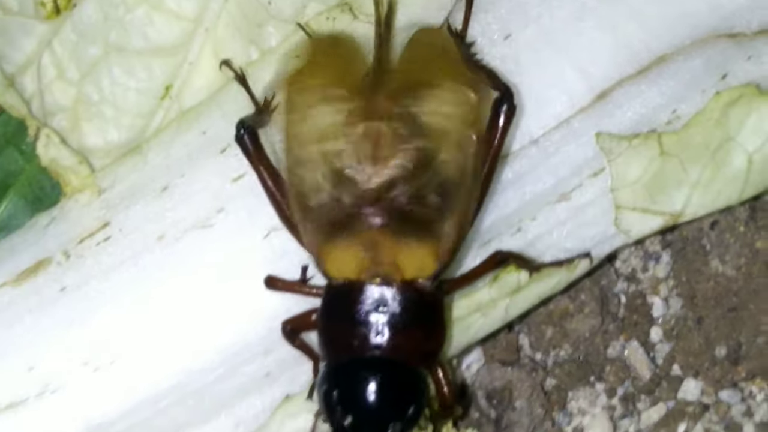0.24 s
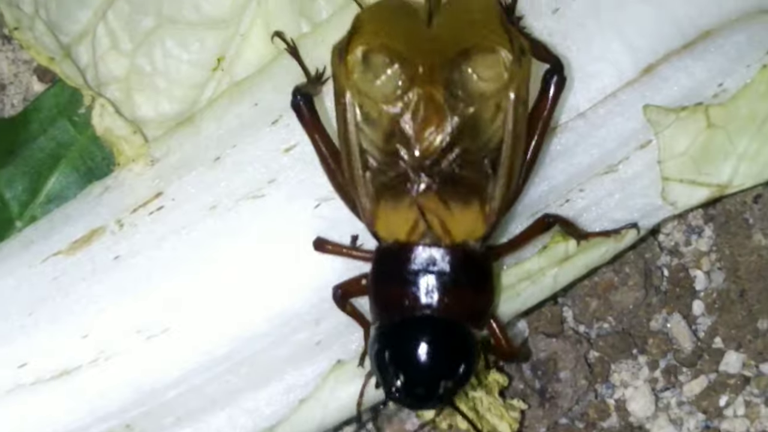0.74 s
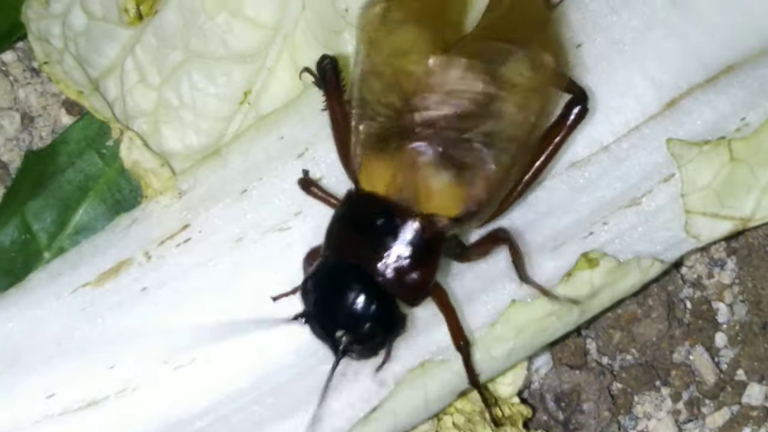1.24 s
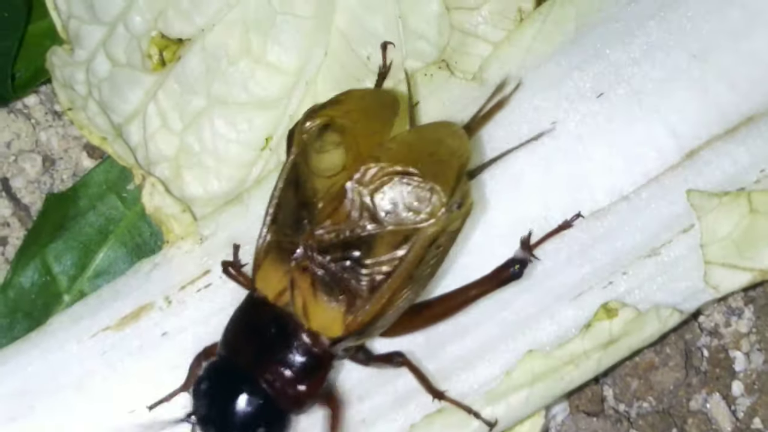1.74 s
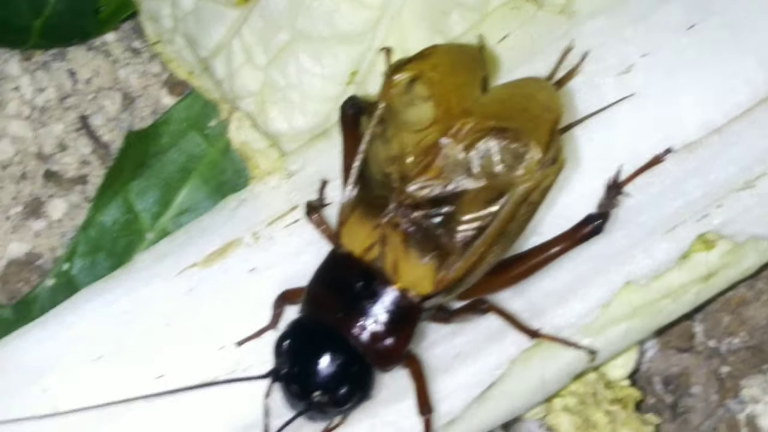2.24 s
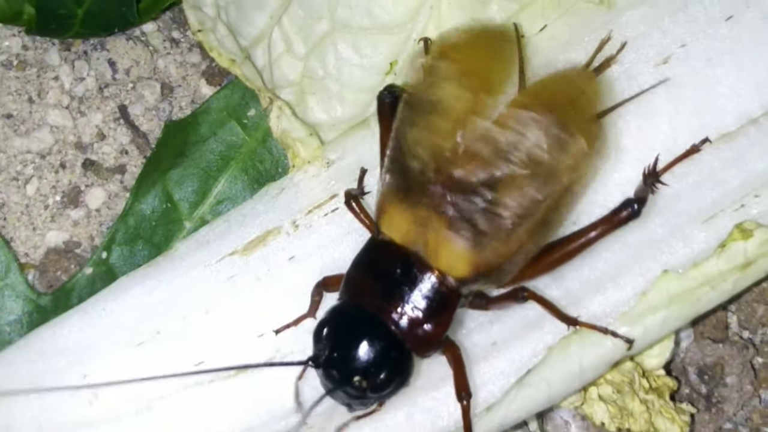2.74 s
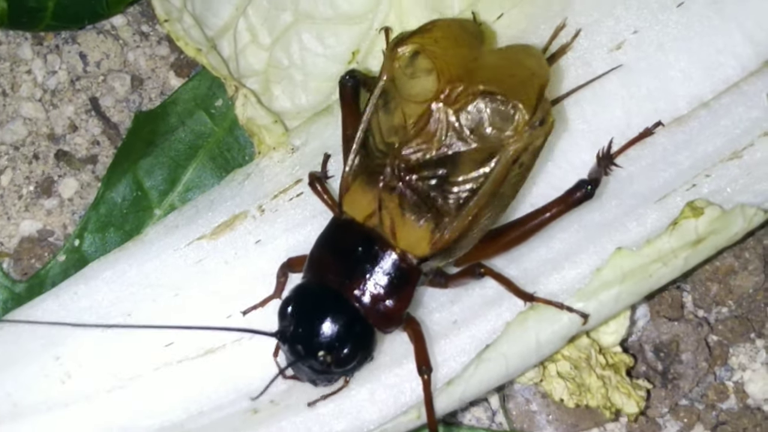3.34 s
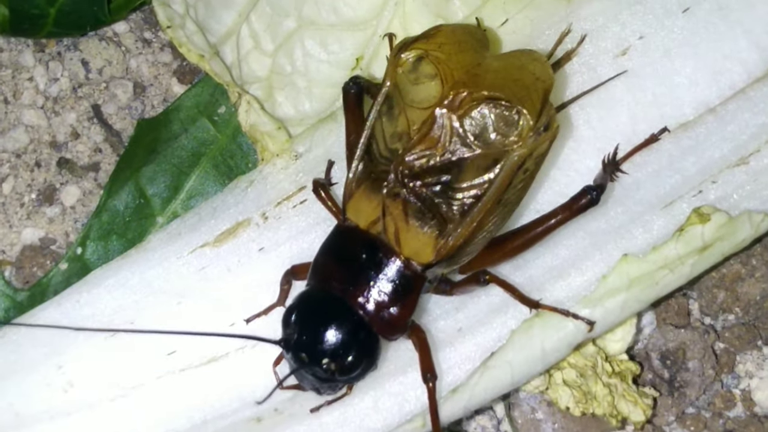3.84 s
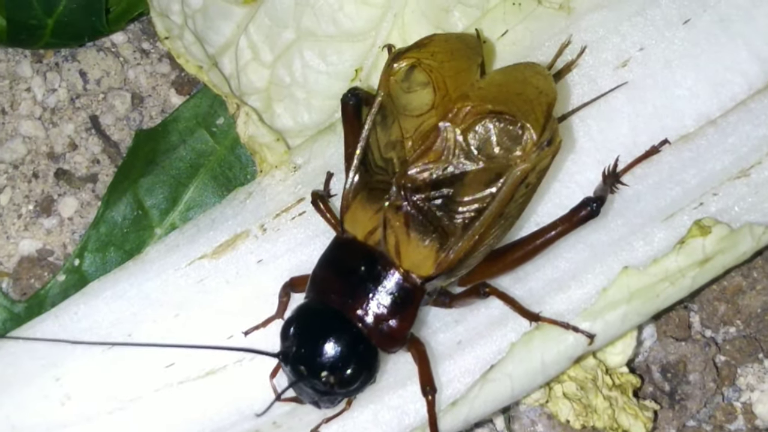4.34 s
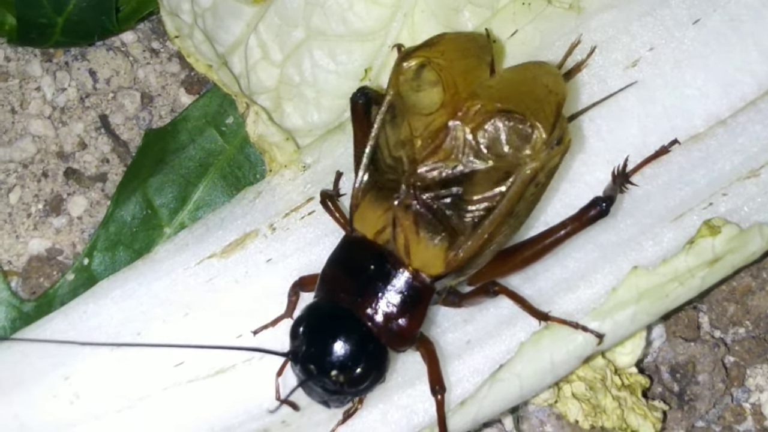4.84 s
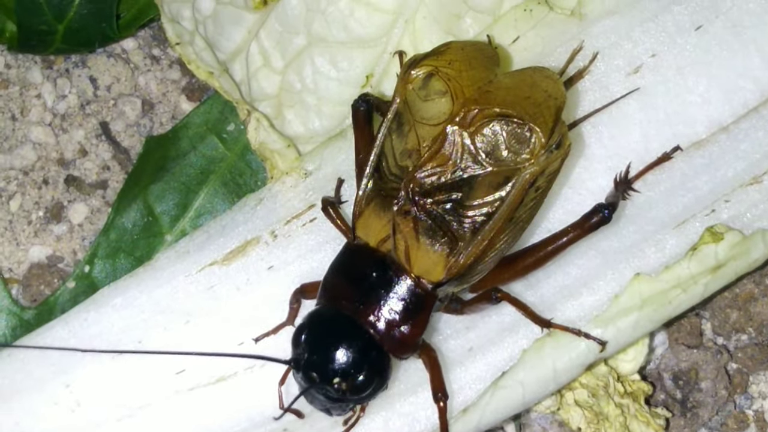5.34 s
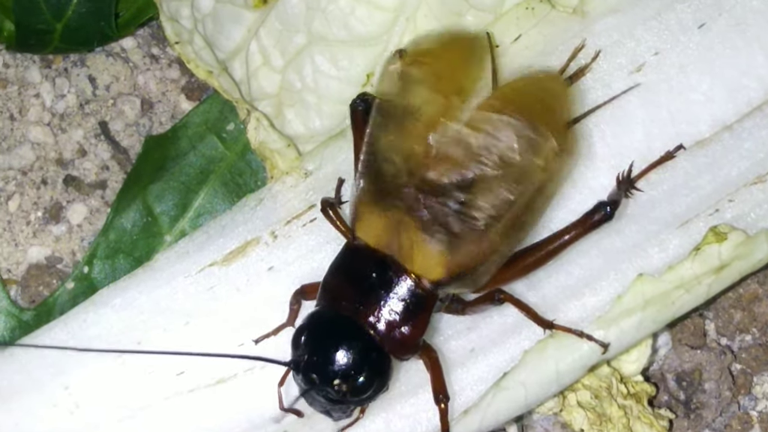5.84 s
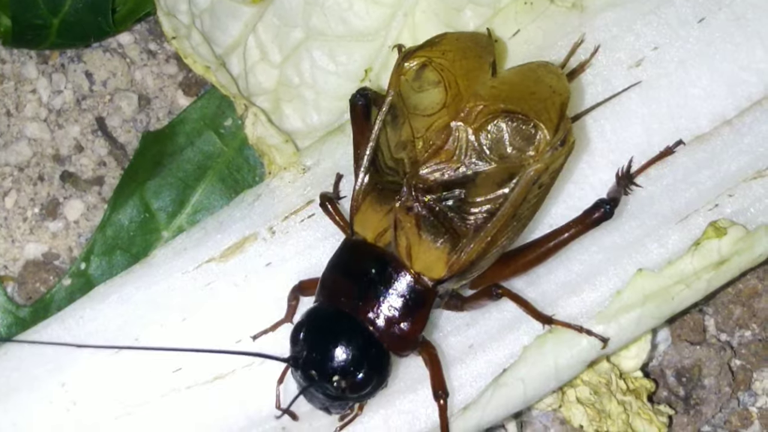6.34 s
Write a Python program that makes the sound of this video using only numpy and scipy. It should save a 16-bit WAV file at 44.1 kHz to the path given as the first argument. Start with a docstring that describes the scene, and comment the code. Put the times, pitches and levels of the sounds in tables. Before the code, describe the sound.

A single cricket chirps loudly, close to the microphone outdoors, for about six and a half seconds. Each chirp is a shrill, high whistle of three very fast pulses, with a raspy edge and a slight echo, and all are about equally loud. For the first two seconds they come four or five times a second, then ease to three or four, with a short pause just before 5.5 seconds. A faint low rumble, hum and thin hiss continue underneath. Soft rustles come at the start and near 1.7 seconds. A very faint, thin, distant squeal glides slowly upward from 0.5 to 1.7 seconds, and barely audible far calls appear between 2 and 5.5 seconds. Quiet dull bumps are scattered throughout, clustering from 3 to 4.3 seconds, with the clearest near 5.1. Three tiny dry ticks fall around 6 to 6.5 seconds as the chirping continues.

```python
"""A field cricket on a leaf

A cricket sings close by and turns once. It stridulates: in each of a chirp's three wing strokes a
scraper runs over a toothed file, giving a falling whistle with a rasping octave that the yard reflects.
Behind it are a low rumble and hum, dull bumps, rustles, one thin far squeal and some faint far calls.
A limiter holds every chirp to the same peak, so the background ducks under each one."""
import sys
import numpy as np
from scipy import signal
from scipy.fft import rfft, irfft
from scipy.io import wavfile
from scipy.ndimage import uniform_filter1d, minimum_filter1d

SR = 44100
rng = np.random.default_rng(int(sys.argv[2]) if len(sys.argv) > 2 else 0)


def bounce(signal):
    """Save signal as a 16-bit WAV file at the path given by the first command-line argument."""
    frames = np.transpose(np.atleast_2d(signal))
    limited = np.clip(frames, -1, 1)
    pcm = np.round(limited * 32767).astype(np.int16)
    wavfile.write(sys.argv[1], SR, pcm)


N = 291060
TIME = np.arange(N) / SR


def gain_of(db):
    """Amplitude ratio: a factor of ten for every 20 dB."""
    return 10 ** (np.asarray(db) / 20)


def unit_rms(x):
    """Normalisation of each channel to unit power."""
    return x / np.sqrt(np.mean(x ** 2, axis=-1, keepdims=True) + 1e-20)


def curve_at(points, hz):
    """Interpolation of a spectrum on a logarithmic frequency axis."""
    f, value = np.transpose(points)
    return np.interp(np.log(hz + 1), np.log(f + 1), value)


def add(mix, s, sound):
    """Superposition of a sound on a two-channel mix at time s."""
    part = mix[:, max(round(s * SR), 0):][:, :sound.shape[-1]]
    part += sound[..., :part.shape[1]]


def wander(rate_hz, size):
    """Random modulation: low-passed Gaussian noise of rms 1."""
    hz = np.fft.rfftfreq(size, 1 / SR)
    return unit_rms(irfft(rfft(rng.standard_normal(size)) * np.exp(-(hz / rate_hz) ** 2), size))


# Coherence between left and right: f/Hz, coherence
COHERENCE = [(30, 0.96), (250, 0.86), (600, 0.19), (2000, 0.063), (8000, 0.2)]

def noise(spectrum, size):
    """Partially coherent stereo noise of rms 1: the two sides are most alike at long wavelengths."""
    hz = np.fft.rfftfreq(size, 1 / SR)
    left, independent = rfft(rng.standard_normal((2, size)))
    coherence = curve_at(COHERENCE, hz)
    right = coherence * left + np.sqrt(1 - coherence ** 2) * independent
    return unit_rms(irfft(np.array([left, right]) * gain_of(curve_at(spectrum, hz)), size))


def yard(x, t60, gap_s, echoes_per_s=3000):
    """Diffuse reverberation: reflections of random sign decay exponentially, differently on each side."""
    t = TIME[:SR // 2]
    taps = rng.choice([-1., 1.], (2, len(t))) * (rng.random((2, len(t))) < echoes_per_s / SR)
    tail = taps * gain_of(-60 * t / t60) * (t > gap_s)
    tail /= np.linalg.norm(tail, axis=1, keepdims=True)
    return signal.oaconvolve(x[None], tail, axes=1)[:, :N]


# Spectra of the rumble and the distant air: f/Hz, relative level/dB
RUMBLE_SPECTRUM = [(15, -65.5), (28, -31), (40, -10), (50, -0.5), (72, 4.5), (100, -1.5), (135, -1.5),
                   (190, -13.5), (300, -49.5), (1000, -91)]
AIR_SPECTRUM = [(40, -26.5), (110, -5.5), (160, 5), (205, -8), (270, -6), (340, -16), (500, -19),
                (900, -19), (1500, -23), (2300, -18), (3300, -24.5), (4500, -25), (7000, -65)]
# Swells of the rumble: centre t/s, duration/s, gain/dB
RUMBLE_SWELLS = [(2.323, 0.25, 6), (3.472, 0.11, 7.5), (4.342, 0.24, 5)]
# Slow rise and fall of the air: t/s, gain/dB
AIR_DRIFT = [(0, 0), (1.5, 1.5), (2.5, 1), (5.2, 0), (5.8, 0.5), (6.6, 0.5)]

def outdoor_air(rumble_db=-48, air_db=-56):
    """Ambient noise: a low rumble and a broader rush under slow amplitude modulation."""
    swells_db = sum(db * np.maximum(1 - 2 * abs(TIME - s) / length_s, 0)
                    for s, length_s, db in RUMBLE_SWELLS)
    rumble = gain_of(rumble_db + swells_db + wander(8.6, N)) * noise(RUMBLE_SPECTRUM, N)
    drift_db = np.interp(TIME, *np.transpose(AIR_DRIFT))
    air = gain_of(air_db + drift_db + 3 * wander(7.7, N)) * noise(AIR_SPECTRUM, N)
    return (rumble + air) * gain_of([[-.7], [.7]])


# Partials of the hum: f/Hz, rms level/dB
HUM_PARTIALS = [(73, -63.5), (163, -68), (267, -73), (816, -88)]

def hum(waver_rad=1.3):
    """Random phase modulation makes each low partial waver."""
    return sum(gain_of(db) * np.sqrt(2) * np.sin(2 * np.pi * hz * TIME + waver_rad * wander(13, N))
               for hz, db in HUM_PARTIALS)


# Soft rustles: t/s, duration/s, level/dB
RUSTLES = [(-.05, 0.63, -45.5), (1.675, 0.18, -48), (3.49, 0.94, -61), (5.2, 0.5, -67)]
# Their spectrum: f/Hz, relative level/dB
RUSTLE_SPECTRUM = [(100, 9.5), (300, 9.5), (700, 0), (1500, -2), (3000, -6), (4500, -15.5), (8500, -30),
                   (11500, -3), (15000, -26.5)]

def rustles(fade_s=0.19, floor_db=-72.5, flicker_db=2):
    """Amplitude-modulated noise: flickering patches rise out of a faint floor."""
    patches = sum(gain_of(db) * np.clip(np.minimum(TIME - s, s + length_s - TIME) / fade_s, 0, 1)
                  for s, length_s, db in RUSTLES)
    envelope = (gain_of(floor_db) + patches) * gain_of(flicker_db * wander(54, N))
    return envelope * noise(RUSTLE_SPECTRUM, N)


# Spectrum of the hiss: f/Hz, relative level/dB
HISS_SPECTRUM = [(20, -78), (2500, -30.5), (4200, 14), (5600, 29), (8000, 1.5), (11500, 26), (16000, -7)]

def hiss(level_db=-70):
    """Stationary noise, faint and high."""
    return gain_of(level_db) * noise(HISS_SPECTRUM, N)


# Spectrum of the sizzle: f/Hz, relative level/dB
SIZZLE_SPECTRUM = [(3000, -11), (6000, -8), (8000, -23), (10000, -2), (12500, -0.5), (15000, -4),
                   (16500, -22)]

def high_sizzle(level_db=-65, patchy_db=2, end_s=2.3, fade_s=.3):
    """Amplitude-modulated noise: a faint, patchy, high sizzle that fades out by 2.3 s."""
    fade = np.clip((end_s - TIME) / fade_s, 0, 1)
    return fade * gain_of(level_db + patchy_db * wander(20, N)) * noise(SIZZLE_SPECTRUM, N)


# Faint far calls: t/s, duration/s, centre f/Hz, bandwidth/Hz, level/dB
FAR_CALLS = [(2.168, 0.16, 1192, 403, -64.5), (2.242, 0.64, 2460, 900, -59.5),
             (2.502, 0.3, 2444, 1120, -71), (3.223, 0.13, 1270, 340, -62.5),
             (4.293, 0.14, 1240, 338, -59.5), (5.365, 0.15, 1263, 316, -58.5)]

def far_calls():
    """Narrow-band noise: a random complex envelope on a carrier gives calls blurred by distance."""
    out = np.zeros((2, N))
    for s, length_s, hz, width_hz, db in FAR_CALLS:
        size = int(length_s * SR)
        blur = np.array([wander(width_hz / 2, size) + 1j * wander(width_hz / 2, size) for _ in range(2)])
        call = (blur * np.exp(2j * np.pi * hz * TIME[:size])).real
        add(out, s, gain_of(db) * call * signal.windows.tukey(size, .6))
    return out


# Course of the squeal: t/s, second harmonic f/Hz, relative level/dB
SQUEAL_GLIDE = [(0.521, 2655, -53.5), (0.564, 2476, -49.5), (0.659, 2430, -53), (0.769, 2580, -45.5),
                (0.861, 2720, -58), (1.04, 2760, -53), (1.3, 2860, -55), (1.452, 2898, -47.5),
                (1.55, 2930, -60), (1.62, 2973, -47), (1.73, 3140, -62.5)]
# Spectral envelope that its harmonics rise through: f/Hz, gain/dB
SQUEAL_SPECTRUM = [(1250, -7), (1500, -10), (2400, 2), (3100, 0), (3800, -20), (4150, -4.5), (4350, -9.5),
                   (4600, -33)]

def far_squeal(waver=0.0028, flicker_db=4.5, trim_db=-9):
    """A harmonic series glides slowly upward, its reverberation as strong as its direct sound."""
    s, hz, db = np.transpose(SQUEAL_GLIDE)
    t = np.arange(s[0], s[-1], 1 / SR)
    pitch = np.interp(t, s, hz) / 2 * (1 + waver * wander(120, len(t)))
    phase = 2 * np.pi * np.cumsum(pitch) / SR
    sound = np.zeros(len(t))
    for k in (1, 2, 3):
        harmonic_db = curve_at(SQUEAL_SPECTRUM, k * pitch) + flicker_db * wander(21, len(t))
        sound += gain_of(harmonic_db) * np.sin(k * phase)
    direct = np.zeros((2, N))
    add(direct, s[0], sound * gain_of(np.interp(t, s, db)) * signal.windows.tukey(len(t), .04))
    return gain_of(trim_db) * (direct + yard(direct[0], t60=0.49, gap_s=0.0042))


# Dull bumps: t/s, relative level/dB, middle/dB re thud, rasp/dB re thud, contact time/s
BUMPS = [(0.128, -35, -21, -28, 0.0057), (0.567, -41, -20, -21, 0.0065), (0.744, -31.5, -26.5, -27, 0.0054),
         (1.622, -42.5, -33, -27, 0.016), (2.197, -43.5, -10, -15, 0.037),
         (3.05, -30.5, -29.5, -41, 0.0064), (3.445, -38.5, -9.5, -8.5, 0.058), (3.6, -42.5, -7, -29, 0.029),
         (3.698, -44, -19, -24.5, 0.051), (3.886, -32, -15, -16.5, 0.017),
         (4.168, -39.5, -40.5, -44, 0.016), (4.224, -42.5, -10.5, -18, 0.067),
         (5.131, -26, -18.5, -28.5, 0.0078)]
# Spectra of a bump's three parts: f/Hz, relative level/dB
THUD_SPECTRUM = [(20, -42), (45, -2.5), (90, -6), (160, 6.5), (215, -2.5), (290, 4.5), (350, -6.5),
                 (450, -14), (800, -33.5), (2000, -57.5)]
MIDDLE_SPECTRUM = [(200, -44), (500, -5.5), (950, -5.5), (1500, -19), (2500, -23.5), (6000, -60.5)]
RASP_SPECTRUM = [(900, -27), (1800, 0.5), (2400, 10), (3000, -12.5), (4500, -14), (9000, -61.5)]

def bumps(size=16384, rise_s=0.0027, fall_s=0.037, thud_t60=0.73, scuff_t60=0.77, trim_db=-3):
    """Damped impacts with a two-stage decay: thud and scuff fall fast after contact, then linger."""
    out, t = np.zeros((2, N)), TIME[:size]
    attack = np.minimum(t / rise_s, 1)
    for s, db, middle_db, rasp_db, contact_s in BUMPS:
        push = np.exp(-np.maximum(t - contact_s, 0) / fall_s)
        thud = noise(THUD_SPECTRUM, size) * (push + gain_of(-16 - 60 * t / thud_t60))
        scuff = gain_of(middle_db) * noise(MIDDLE_SPECTRUM, size)
        scuff += gain_of(rasp_db) * noise(RASP_SPECTRUM, size)
        scuff *= (push + gain_of(-9 - 60 * t / scuff_t60)) * gain_of(3.3 * wander(150, size))
        add(out, s - rise_s, gain_of(db + trim_db) * (thud + scuff) * attack)
    return out * gain_of([[-1], [.7]])


# Dry ticks: t/s, level/dB
TICKS = [(5.901, -48.5), (6.207, -39), (6.476, -44)]
# Their spectrum: f/Hz, relative level/dB
TICK_SPECTRUM = [(150, -17), (500, 0), (900, -13.5), (2500, -20), (5000, -26), (10000, -53)]

def ticks(size=2048, fall_s=0.0034):
    """Heavy damping: tiny contacts die away within milliseconds."""
    out = np.zeros((2, N))
    for s, db in TICKS:
        add(out, s, gain_of(db) * noise(TICK_SPECTRUM, size) * np.exp(-TIME[:size] / fall_s))
    return out


def wing_resonance(x, band_hz=(4693, 5815)):
    """The wing membrane radiates the tone only around its resonance."""
    return signal.sosfiltfilt(signal.butter(2, band_hz, "band", fs=SR, output="sos"), x)


def opening_ring(left_db=-43, right_db=-35, t60=0.33):
    """Free decay: at the start the yard still rings from the chirp before."""
    ring = unit_rms(wing_resonance(rng.standard_normal((2, N))))
    return ring * gain_of([[left_db], [right_db]]) * gain_of(-60 * TIME / t60)


def song_reverb(song, split_hz=8500, shift_s=1.7):
    """Time-varying reverberation: three sets of paths cross-fade as the cricket moves."""
    octave = signal.sosfiltfilt(signal.butter(4, split_hz, "high", fs=SR, output="sos"), song[1])
    tone = song[1] - octave
    out = np.zeros((2, N))
    for k in range(3):
        share = np.sqrt(2 / 3) * np.sin(np.pi * (TIME / shift_s + k / 3))  # the squares sum to 1
        out += yard(tone * share, t60=0.36, gap_s=0.0059) * gain_of([[-17.5], [-10]])
        out += yard(octave * share, t60=0.25, gap_s=0.0017) * gain_of([[-10], [-8]])
    return out


def wing_puffs(size=512, level_db=-44, delay_s=.011):
    """Windowed noise bursts: a soft low puff goes with the end of every wing stroke."""
    out = np.zeros((2, N))
    for start, _ in CHIRPS:
        for s in STROKE_STARTS_S:
            puff = noise(THUD_SPECTRUM, size) * np.hanning(size)
            add(out, start + s + delay_s, gain_of(level_db) * puff)
    return out


def reflected(x, echoes, left_late_s=.000187):
    """Comb filtering: near reflections interfere with the direct sound; the left path is longer."""
    hz = np.fft.rfftfreq(x.shape[-1], 1 / SR)
    left, right = (1 + sum(g * np.exp(-2j * np.pi * hz * ms / 1000) for ms, g in side)
                   for side in echoes)
    left *= np.exp(-2j * np.pi * hz * left_late_s)
    return irfft(rfft(x) * np.array([left, right]), x.shape[-1])


# Spectrum of the wings opening: f/Hz, relative level/dB
OPENING_SPECTRUM = [(2000, -32.5), (4000, -17), (5200, 7), (7000, -5.5), (8500, -22), (10500, 7.5),
                    (12500, 0), (14000, -10.5), (16000, -15)]

def wing_opening(size=352, level_db=-34, spread_db=2):
    """Friction noise: the wings open with a small uneven scratch."""
    scratch = noise(OPENING_SPECTRUM, size) * np.hanning(size) * (1 + .4 * wander(700, size))
    return scratch * gain_of(level_db + spread_db * rng.standard_normal())


# One closing of the wings: fraction of stroke, base tooth rate f/Hz, tone amplitude, octave amplitude
STROKE_SHAPE = [(0, 5670, 0, 0.23), (0.119, 5958, 0.36, 0.5), (0.399, 5814, 0.78, 0.4),
                (.65, 5709, 0.65, 0.6), (0.802, 5531, 0.62, 0.4), (0.91, 5358, 0.41, 0.07),
                (0.999, 5804, 0.49, 0.53)]
# Dry scrape of the file: f/Hz, relative level/dB
SCRAPE_SPECTRUM = [(2000, -96), (4000, -31), (5500, 11.5), (7000, 3.5), (8500, -28.5), (10000, 1.5),
                   (11300, -1), (13000, -40.5), (14200, 11), (15400, 2), (16500, -29)]

def wing_stroke(length_s, offset_hz, droop_hz, spread_hz=10, jitter_hz=14, rough=0.38, flutter_rad=0.047):
    """Stridulation: the tooth rate sets the pitch, which falls as the scraper slows."""
    size = int(length_s * SR)
    progress = np.linspace(0, 1, size)
    fraction, *columns = np.transpose(STROKE_SHAPE)
    hz, tone_amp, octave_amp = (np.interp(progress, fraction, column) for column in columns)
    hz += offset_hz + spread_hz * rng.standard_normal() - droop_hz * progress ** 5
    hz += jitter_hz * wander(1400, size)
    phase = 2 * np.pi * np.cumsum(hz) / SR + rng.uniform(0, 2 * np.pi)
    grip = 1 + rough * wander(1000, size)  # uneven teeth roughen the overtones
    harmonics = np.sin(2 * phase + flutter_rad * wander(840, size)) + gain_of(-28) * np.sin(3 * phase)
    scrape = octave_amp * noise(SCRAPE_SPECTRUM, size)[0]
    tone = tone_amp * np.sin(phase) + gain_of(-33) * scrape
    overtones = octave_amp * grip * harmonics + gain_of(-26) * scrape
    return signal.windows.tukey(size, .12) * np.array([tone, overtones])


# Reflections from leaf and ground, a left list and a right list: delay/ms, amplitude
ECHOES_BEFORE_TURN = [
    [(1.872, .15), (4.073, .32), (8.344, .13), (15.317, .43)],
    [(.882, .73), (3.524, .4), (14.63, .35)],
]
ECHOES_AFTER_TURN = [
    [(.661, .57), (2.92, .36), (11.503, .24), (14.139, .36)],
    [(.623, .34), (1.978, .16), (3.394, .11), (14.087, .18)],
]
# Levels in the wings' beam: t/s, left tone level/dB, left octave level/dB, right octave level/dB
BEAM_LEVELS = [(.3, -23.5, -29.5, -22.5), (1.27, -28, -20.5, -21.5), (1.7, -25.5, -26, -20),
               (2.151, -24, -40.5, -26), (2.5, -20.5, -40.5, -24.5), (3.5, -27.5, -27, -24.5),
               (4.751, -20.5, -28.5, -24), (6.399, -21.5, -31.5, -26)]
# Chirps: t/s, pitch offset/Hz
CHIRPS = [(0.0694, 20.5), (.288, 25), (0.6079, 25), (.832, 43), (1.0515, -6.5), (1.2657, -20.5),
          (1.47, -10), (1.6951, -67), (1.908, -18.5), (2.1104, 31.5), (2.444, -1), (2.7383, 11.5),
          (3.0067, 7), (3.2666, 13.5), (3.495, 12), (3.7298, 21.5), (4.0326, -3), (4.428, 18), (4.7361, -8),
          (5.0097, -1), (5.5337, -11.5), (5.835, -16.5), (6.1418, -6), (6.4093, 13)]
STROKE_STARTS_S, STROKE_S = (0, .0258, .0531), .0175
FIRST_STROKE_S, DROOP_HZ = (.0128, .0158), (229, 30)  # each: before, after the turn

def cricket(size=4608, turn_s=2.3, tone_right_db=-8.5, octave_echo=0.11, opening_lead_s=0.0115):
    """Directional radiation: the wings beam each chirp, so its levels swing as the cricket shifts."""
    out = np.zeros((2, N))
    beam_s, *beam_db = np.transpose(BEAM_LEVELS)
    for start, offset_hz in CHIRPS:
        turned = int(start > turn_s)
        late_s = STROKE_S - FIRST_STROKE_S[turned]  # the first stroke catches the file late
        first = wing_stroke(FIRST_STROKE_S[turned], offset_hz, DROOP_HZ[turned])
        first[1] *= np.linspace(0, 1, first.shape[1]) ** 0.72  # and its rasp swells
        chirp = np.zeros((2, size))  # rows: tone, overtones
        add(chirp, late_s, first * gain_of([[0.5], [13.5]]))
        for s in STROKE_STARTS_S[1:]:
            add(chirp, s, wing_stroke(STROKE_S, offset_hz, DROOP_HZ[turned]))
        echoes = ECHOES_AFTER_TURN if turned else ECHOES_BEFORE_TURN
        # the octave is beamed, so it echoes less
        weak_echoes = [[(ms, octave_echo * g) for ms, g in side[:3]] for side in echoes]
        tone = unit_rms(reflected(wing_resonance(chirp[0]), echoes))
        octave = unit_rms(reflected(chirp[1], weak_echoes))
        tone_left_db, octave_left_db, octave_right_db = (np.interp(start, beam_s, db) for db in beam_db)
        add(out, start, tone * gain_of([[tone_left_db], [tone_right_db]]))
        add(out, start, octave * gain_of([[octave_left_db], [octave_right_db]]))
        add(out, start + late_s - opening_lead_s, wing_opening())
    return out


def scene():
    """Superposition of the cricket close by and everything else far behind it."""
    song = cricket()
    mix = song + song_reverb(song) + opening_ring() + high_sizzle() + wing_puffs()
    mix += bumps() + ticks() + far_squeal() + far_calls()
    return mix + outdoor_air() + hum() + rustles() + hiss()


def limiter(x, ceiling_db=-5.5, recovery_db_per_s=67, window=700):
    """Look-ahead peak limiting: both channels are pulled down to the ceiling and recover steadily."""
    over_db = np.maximum(20 * np.log10(abs(x).max(0) + 1e-9) - ceiling_db, 0)
    ahead_db = -minimum_filter1d(-over_db, window)
    recovered_db = recovery_db_per_s * TIME
    reduction_db = np.maximum.accumulate(ahead_db + recovered_db) - recovered_db
    return x * gain_of(-uniform_filter1d(reduction_db, window))


def record(dry, edge_hz=15900):
    """Peak limiting, then band limiting by a steep low-pass filter."""
    low_pass = signal.firwin(255, edge_hz, window=("kaiser", 9), fs=SR)
    return signal.oaconvolve(limiter(dry), low_pass[None], "same")


dry = scene()
out = record(dry)
bounce(out)
```